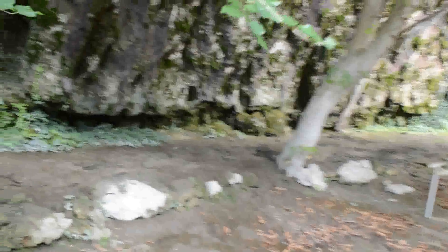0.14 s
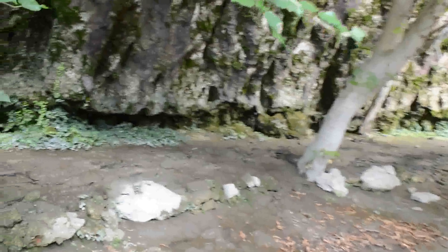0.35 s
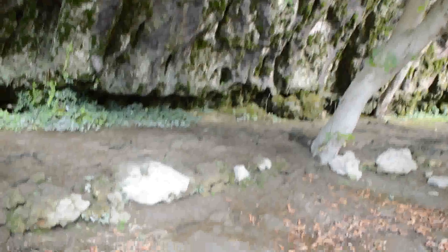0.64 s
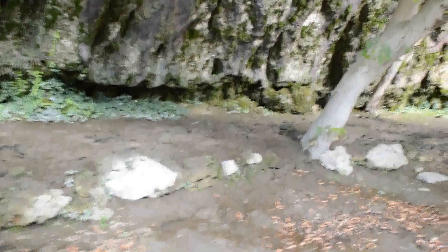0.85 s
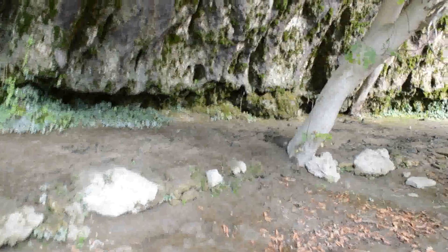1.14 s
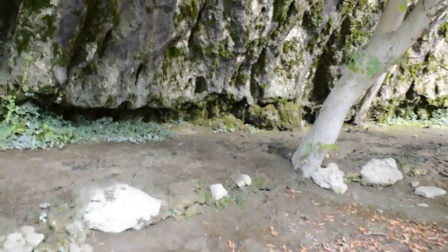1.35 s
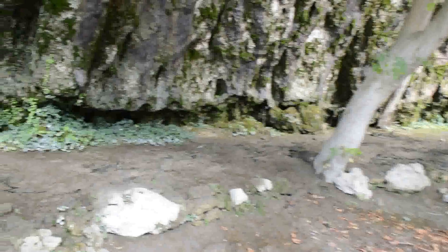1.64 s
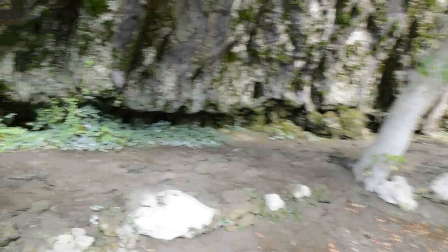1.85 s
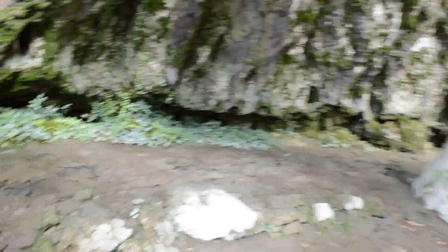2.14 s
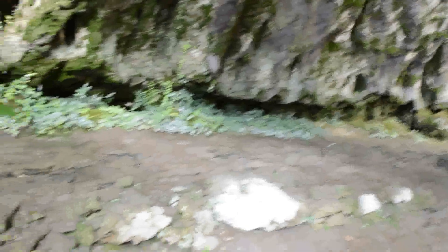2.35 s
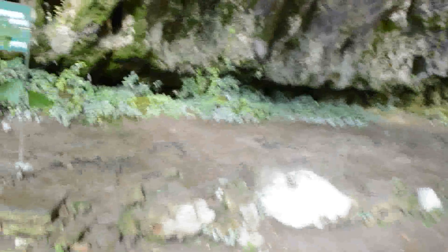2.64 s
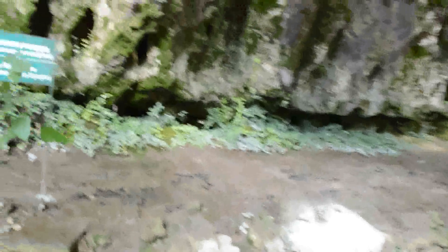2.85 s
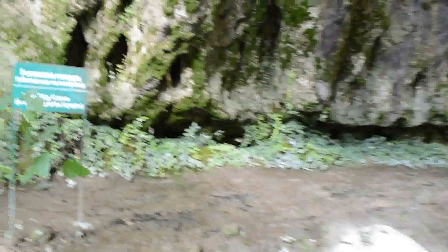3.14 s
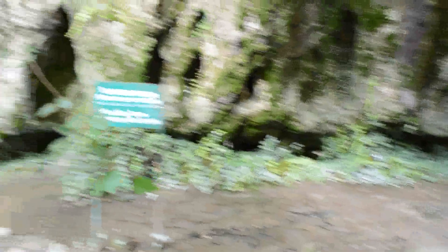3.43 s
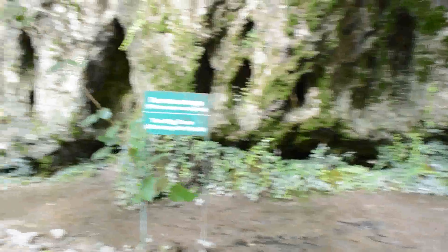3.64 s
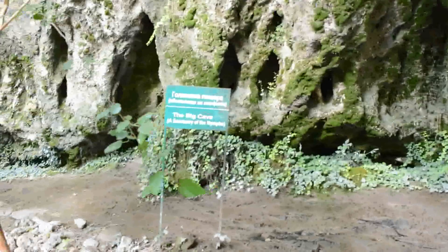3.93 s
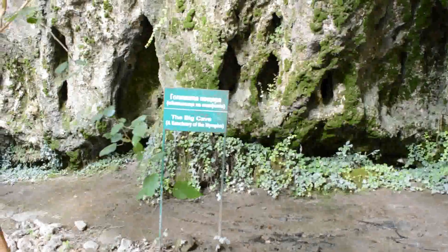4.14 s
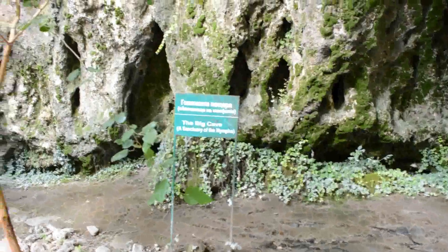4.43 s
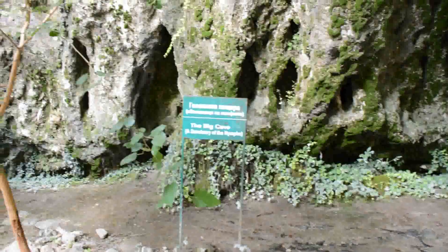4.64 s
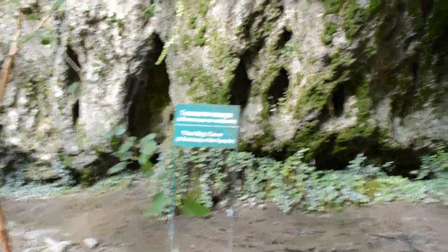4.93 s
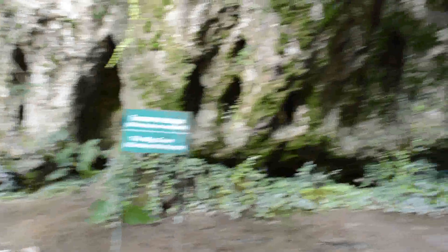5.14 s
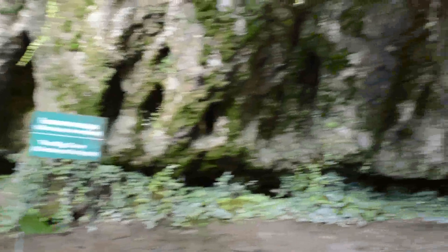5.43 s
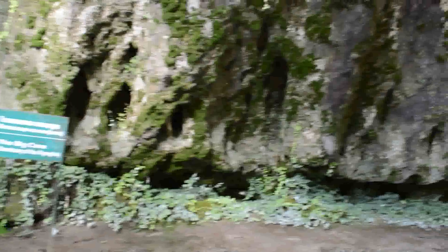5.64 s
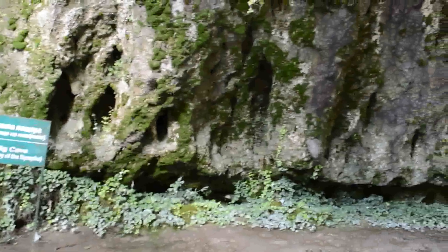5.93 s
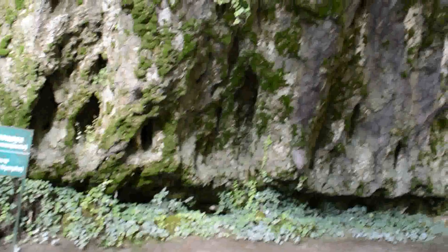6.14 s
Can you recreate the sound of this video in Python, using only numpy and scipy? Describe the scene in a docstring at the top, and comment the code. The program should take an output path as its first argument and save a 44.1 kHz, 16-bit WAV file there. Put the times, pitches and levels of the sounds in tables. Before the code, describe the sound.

Close, dry-edged dripping dominates: treble-heavy ticks of varied loudness, the strongest a lower, woody smack about one second in, others clustering before three seconds. Light patter and a faint far trickle fill the gaps; small bubbles plip in puddles. Someone moves slightly with a handheld camera, causing plastic clicks, dull thuds, faint grit scuffs and low rumble. Sheltered outdoor rock, short faint echo, centered mono sound.

```python
"""Under a mossy overhang: drops fall onto leaves and wet ground, and the rock answers with a short grainy echo.
Close by, each loud drop is a brief ring with a broad crack; drips in puddles are ringing bubbles that glide up.
Smaller drops patter around; farther off, flickering bands of noise make a trickle, narrow ones a low drone.
A walker holds a camera with one microphone: its shell clicks, steps and hands thud, soles scuff, the capsule
rumbles. The capsule favours the upper treble of the drops."""
import sys
import numpy as np
from scipy import signal
from scipy.io import wavfile

SR = 44100
rng = np.random.default_rng(int(sys.argv[2]) if len(sys.argv) > 2 else 0)


def to_wav(s):
    """Save 16-bit WAV."""
    ch = np.atleast_2d(s).T  # columns
    pcm = np.round(np.clip(ch, -1, 1) * 32767)  # PCM
    wavfile.write(sys.argv[1], SR, pcm.astype(np.int16))


N = 276948

# Distant low drone. Each row: centre in Hz, width in Hz, rms level in dB.
DRONE_TONES = [(62.9, 3, -68), (127.7, 31, -63)]
# Colour of the distant trickle. Each row: frequency in Hz, relative noise density in dB per Hz.
TRICKLE_COLOUR = [(24, -36), (40, -34), (223, 6), (483, 2.5), (533, 0.5), (619, 1.5), (923, 3),
                  (1410, -0.5), (3820, -9), (6440, -0.5), (7860, -16.5), (9590, 5), (14300, -19),
                  (15400, -7)]
TRICKLE_DB = -48.5  # rms
# Rumble of hands and wind on the capsule. Each row: time in seconds, level in dB.
RUMBLE_LEVEL = [(0.0, -82), (0.17, -51), (0.23, -67), (0.54, -60), (0.58, -85), (0.63, -67), (0.75, -50),
                (1.47, -87), (2.1, -67), (2.17, -60), (2.2, -75), (2.89, -84), (4.67, -113), (4.78, -101),
                (4.93, -86), (6.28, -76)]
# Soles scuffing grit. Each row: middle in seconds, length in seconds, level before fading in dB, centre in Hz.
SCUFFS = [(0.093, .06, -44, 1500), (0.738, .05, -45, 890), (0.877, .05, -51, 496), (1.817, .08, -47.5, 600),
          (1.919, .04, -45, 800), (2.69, .08, -46, 610), (3.39, .12, -49.5, 400), (3.553, .08, -53, 300),
          (3.877, .09, -46.5, 600), (4.571, .1, -46, 1900), (5.924, .11, -42.5, 910)]
# Dull thuds of steps and hands. Each row: start in seconds, peak before thinning in dB, pitch in Hz.
THUDS = [(0.156, -38, 345), (0.7369, -28, 450), (0.874, -39, 200), (1.7914, -22.5, 367), (1.912, -37, 256),
         (1.921, -43, 406), (2.663, -35, 550), (2.678, -31.5, 225), (3.364, -36, 380), (3.374, -32.5, 174),
         (3.855, -41, 400), (3.875, -35.5, 182), (5.884, -45, 150), (5.941, -38, 187)]
THUD_CYCLES = 0.91
THUD_TICK_DB, THUD_TICK_HZ = -6, 1500  # tick on the start of a 350 Hz thud, relative to the thud
THUD_TICK_DB_PER_OCTAVE = 9  # deep thuds are soft blows with little tick
# Clicks of the camera shell. Each row: start in seconds, peak in dB, pitch that the struck spot favours in Hz,
# how freely the grip lets it ring as a share of the free decay time.
CLICKS = [(.072, -34, 1300, 0.65), (0.0852, -31.5, 2280, 0.96), (0.4611, -20, 1510, 0.99),
          (0.5354, -18.5, 2480, 0.99), (2.1688, -27.5, 1480, 0.98)]
# Modes of the shell. Each row: pitch in Hz, relative level in dB, free decay by 60 dB in seconds.
SHELL_MODES = [(1026, 5.5, 0.034), (1190, 12, 0.011), (1880, 10.5, 0.012), (2230, 13, 0.0071),
               (2477, 11, 0.016), (3130, 2, 0.018)]
# Swell of the patter. Each row: time in seconds, relative level in dB.
PATTER_SWELL = [(0.0, -38), (0.45, -42.5), (0.66, -40), (1.21, -40.5), (1.82, -44.5), (2.17, -37),
                (2.33, -38.5), (2.62, -42.5), (2.82, -40), (3.55, -43.5), (4.39, -42), (4.55, -40),
                (4.88, -44), (5.11, -41.5), (5.27, -40), (5.61, -44.5), (5.89, -40.5), (6.28, -45)]
# Rock faces that return more sound. Each row: delay in seconds, spread in seconds, lift in dB.
ROCK_FACES = [(0.0132, 0.00077, 5.5), (0.0019, 0.02, 3)]
# Drips that trap a bubble in a puddle. Each row: start in seconds, peak at the capsule in dB, pitch in Hz.
DRIPS = [(1.4012, -45, 1800), (1.5228, -44, 1700), (1.681, -44, 1320), (1.728, -42, 1910),
         (2.776, -46, 1300), (2.7904, -38.5, 1325), (3.3894, -49, 2320), (3.4236, -43, 1590),
         (3.5423, -42, 1120), (3.7683, -38.5, 3030), (3.9382, -42.5, 1730), (3.9973, -41, 1970),
         (4.0498, -40, 1770), (4.1642, -44, 1810), (4.432, -45, 1760), (5.306, -43, 1780),
         (5.47, -43, 1770), (5.8474, -38.5, 1800)]
# Loud drops. Each row: start in seconds, peak at the capsule in dB, pitch in Hz, relative echo gain in dB.
DROPS = [(0.0161, -13, 8860, -37), (0.1937, -34.5, 4140, -23), (0.3896, -26.5, 10000, -35),
         (0.4507, -26, 10300, -39), (0.5832, -14, 8400, -20), (0.5949, -18, 5550, -40),
         (0.596, -24, 8400, -23), (0.6543, -26.5, 4400, -36), (0.9375, -28.5, 9800, -23.5),
         (1.0549, -5, 3050, -28), (1.1864, -29.5, 9200, -28), (1.2781, -20, 2740, -31.5),
         (1.2806, -19.5, 9200, -36), (1.3596, -36, 8550, -18), (1.4474, -28.5, 10500, -24),
         (1.492, -26, 2870, -33), (1.5006, -24, 6470, -34), (1.6046, -25, 8000, -27),
         (1.7124, -31, 10000, -20), (1.7932, -33.5, 6850, -21), (1.882, -24, 9600, -28),
         (1.933, -27, 9200, -33), (1.9602, -27, 3200, -33), (2.0713, -34, 7340, -33),
         (2.1504, -32.5, 6400, -19.5), (2.1886, -27, 8950, -26), (2.2028, -21.5, 6350, -40),
         (2.243, -33, 8300, -18), (2.2796, -21, 8000, -26.5), (2.3136, -18, 9700, -33),
         (2.3423, -25, 8500, -36), (2.3995, -20, 8600, -41), (2.4048, -27.5, 7240, -23.5),
         (2.4264, -29, 9000, -35), (2.5075, -22, 3270, -27), (2.637, -33, 6600, -23.5),
         (2.647, -24, 7600, -38), (2.701, -30, 9100, -29), (2.8159, -15, 6560, -34),
         (2.9085, -20, 9100, -35), (2.9429, -10, 7410, -31), (3.217, -25, 7600, -32),
         (3.3534, -27.5, 6400, -43), (3.4406, -22, 9900, -35), (3.494, -35, 9800, -19.5),
         (3.7413, -15, 7700, -32), (3.9793, -27, 8400, -26.5), (4.088, -24.5, 7600, -24),
         (4.262, -27, 8350, -36), (4.106, -34.5, 4150, -24), (4.3751, -33.5, 10000, -24.5),
         (4.5523, -24, 2550, -26.5), (4.566, -31.5, 6100, -22.5), (4.567, -32, 10500, -19.5),
         (4.616, -33, 6500, -21), (4.686, -30.5, 2480, -24.5), (4.812, -22.5, 9700, -31),
         (5.0903, -26, 7100, -31), (5.1511, -15.5, 7900, -30), (5.225, -22.5, 10500, -38),
         (5.306, -27, 6300, -35), (5.3163, -30, 10100, -23), (5.3745, -23, 7800, -27.5),
         (5.4854, -26, 10100, -36), (5.6382, -28, 6550, -24.5), (5.7537, -28, 3700, -26.5),
         (5.8018, -29, 8700, -23.5), (5.8434, -19, 9200, -35), (5.853, -34, 10500, -25),
         (5.9558, -35, 7740, -22), (6.1887, -29.5, 8100, -20)]
# How long a struck leaf rings. Each row: pitch in Hz, cycles (60 dB of decay takes three times as many).
LEAF_CYCLES = [(2500, 0.7), (3100, 1.5), (4300, 5.2), (5700, 14), (6500, 2.04), (7600, 0.73), (8400, 1.43),
               (10200, 3.6)]
CRACK_DB, CRACK_DB_PER_OCTAVE = -1, -4  # crack beside a 9 kHz ring; it stands out more beside lower rings
ECHO_WIDTH = 0.33  # width of the echo's pitch filter, as a share of the pitch
ECHO_RING_DB, ECHO_BLOW_DB = 1.5, -2.5  # added to each drop's echo gain: narrow ring, whole blow
ECHO_BLOW_T60_S = 0.19
TOP_HZ = 15450


def undb(db):
    """Turn dB into a gain."""
    return 10 ** (np.asarray(db) / 20)


def level(x, db):
    """Scale to an rms level in dB."""
    return x * undb(db) / np.sqrt(np.mean(x ** 2))


def curve(table):
    """A (seconds, value) table read at every sample."""
    return np.interp(np.arange(N) / SR, *np.transpose(table))


def band(x, hz, width_hz):
    """Two-pole band-pass, gain 1 at the centre."""
    return signal.lfilter(*signal.iirpeak(min(hz, .45 * SR), hz / width_hz, fs=SR), x)


def thin(x, hz):
    """High-pass: a small source sends out little below its own pitch."""
    return signal.lfilter(*signal.butter(2, hz, "high", fs=SR), x)


def walk(rate):
    """Random levels, this many a second, joined by slopes; spread about 1.3."""
    knots = rng.standard_normal(int(N / SR * rate) + 2)
    return 1.6 * np.interp(np.arange(N) * rate / SR, np.arange(len(knots)), knots)


def add(out, s, grain):
    """Mix a grain in at a time in seconds."""
    i = int(s * SR)
    out[i:i + len(grain)] += grain[:len(out) - i]


def ring(hz, cycles, glide=0., rise=0.44):
    """A peak-1 ring: swells over `rise` cycles, dies by 60 dB in three times `cycles` (1.5 at least)."""
    decay_cycles = 3 * max(cycles, .5)
    turns = np.arange(int(decay_cycles * SR / hz) + 8) * hz / SR
    fade = turns / decay_cycles
    swell = 1 - np.exp(-(turns / rise) ** 2)
    x = np.sin(2 * np.pi * turns * (1 + glide * fade)) * 1000. ** -fade * swell
    return x / np.abs(x).max()


def burst(t60_s):
    """A dying puff of noise."""
    t = np.arange(int(t60_s * SR) + 2) / SR
    return rng.standard_normal(len(t)) * 1000. ** (-t / t60_s)


def drone():
    """Far off: narrow bands of noise waver like low tones."""
    return sum(level(band(rng.standard_normal(N), hz, width_hz), db) for hz, width_hz, db in DRONE_TONES)


def trickle():
    """Distant trickle: third-octave noise bands flicker alone; the higher ones follow the patter a little."""
    out, swell_db = 0, curve(PATTER_SWELL)
    points_hz, points_db = np.transpose(TRICKLE_COLOUR)
    for hz in 45 * 2 ** (np.arange(26) / 3):
        colour_db = np.interp(np.log(hz), np.log(points_hz), points_db)
        flicker_db = 1.62 * walk(9)
        # no following up to 600 Hz, full share from two octaves above
        share = 0.37 * np.clip(np.log2(hz / 600) / 2, 0, 1)
        follow_db = share * (swell_db - swell_db.mean())
        noise = band(band(rng.standard_normal(N), hz, hz / 3), hz, hz / 3)
        out = out + undb(colour_db + flicker_db + follow_db) * noise
    return level(out, TRICKLE_DB)


def rumble():
    """Hands and wind on the capsule: unsteady noise narrowed around 39 Hz."""
    noise = rng.standard_normal(N)
    for _ in range(3):
        noise = band(noise, 39, 34)
    noise *= undb(2.5 * walk(10))
    return level(noise, 0) * undb(curve(RUMBLE_LEVEL))


def scuffs():
    """Soles on grit: noise with a fast random level, filtered and faded in and out."""
    out = np.zeros(N)
    for s, length_s, db, hz in SCUFFS:
        size = int(length_s * SR)
        grit = rng.standard_normal(size) * undb(2.7 * walk(304)[:size])
        add(out, s - length_s / 2, level(band(grit, hz, 1.04 * hz), db) * np.hanning(size))
    return out


def thuds():
    """Steps and hands: a heavily damped low ring with a tick on its start."""
    out = np.zeros(N)
    for s, db, hz in THUDS:
        add(out, s, undb(db) * thin(ring(hz, THUD_CYCLES, rise=0.34), 0.35 * hz))
        tick_db = db + THUD_TICK_DB + THUD_TICK_DB_PER_OCTAVE * np.log2(hz / 350)
        add(out, s, undb(tick_db) * ring(THUD_TICK_HZ, 2.6, rise=0.14))
    return out


def clicks():
    """Camera shell in the hand: modes near the struck spot's pitch are favoured, and the grip damps them."""
    out = np.zeros(N)
    t = np.arange(SR // 20) / SR
    for s, db, spot_hz, freedom in CLICKS:
        grain = np.zeros(len(t))
        for (hz, mode_db, t60_s), chance in zip(SHELL_MODES, rng.standard_normal(len(SHELL_MODES))):
            tilt_db = -4.5 * np.log2(hz / spot_hz) ** 2 + 0.39 * chance
            decay = 1000. ** (-t / (freedom * t60_s))
            grain += undb(mode_db + tilt_db) * np.sin(2 * np.pi * hz * t) * decay
        grain *= 1 - np.exp(-t / 0.00034)
        add(out, s, undb(db) * grain / np.abs(grain).max())
        # a thin tick as the parts slip, just before the shell rings
        add(out, s - .0008, undb(db - 3.0) * band(burst(0.0072), 6800, 7100))
    return out


def rock(x, t60_low_s=0.5, t60_high_s=0.2, split_hz=4500):
    """Echo of the craggy face: decaying noise, drawn afresh each time, with a decay time each side of the split."""
    t = np.arange(SR * 2 // 5) / SR
    noise = rng.standard_normal(len(t))
    low = signal.lfilter(*signal.butter(1, split_hz, fs=SR), noise)
    tail = low * 1000. ** (-t / t60_low_s) + (noise - low) * 1000. ** (-t / t60_high_s)
    lift_db = sum(db * np.exp(-((t - delay_s) / spread_s) ** 2) for delay_s, spread_s, db in ROCK_FACES)
    # single crags stand out as lumps about 3 milliseconds long
    lift_db = lift_db + 2 * np.repeat(rng.standard_normal(len(t) // 128 + 1), 128)[:len(t)]
    build_up = np.clip(t / .003, 0, 1)
    return signal.fftconvolve(x, undb(lift_db) * build_up * tail)


def patter(count=1500, spots=5, low_hz=1500, octaves=2.97, tilt_db=5.0, db=-6.0):
    """Small drops at random on several spots: short rings, most faint, a few louder, each spot with its echo."""
    out = np.zeros(N)
    for drops_here in rng.random((spots, count // spots, 4)):
        near = np.zeros(N)
        for when, size, pitch, length in drops_here:
            grain = ring(low_hz * 2 ** (octaves * pitch ** .5), 1.6 + 3 * length)
            size_db = -3 * np.log(1 - .96 * size)
            pitch_db = tilt_db * octaves * pitch  # higher drops are louder
            add(near, when * N / SR, undb(pitch_db + size_db) * grain)
        out += near + undb(-25) * rock(near)[:N]
    return level(out, db) * undb(curve(PATTER_SWELL))


def drips():
    """A bubble trapped in a puddle rings for many cycles, gliding up, with a faint echo."""
    out = np.zeros(N)
    for s, db, hz in DRIPS:
        grain = undb(db) * ring(hz, 25.0, glide=.14, rise=0.79)
        add(out, s, grain)
        add(out, s, undb(-40) * rock(grain))
    return out


def drops():
    """Close by: a blow makes a leaf ring under a broad crack; the rock returns the ring and the whole blow."""
    out = np.zeros(N)
    for s, db, hz, echo_db in DROPS:
        grain = ring(hz, np.interp(hz, *np.transpose(LEAF_CYCLES)))
        crack_db = CRACK_DB + CRACK_DB_PER_OCTAVE * np.log2(hz / 9000)
        crack = ring(12650, 1.0, rise=0.094)[:len(grain)]
        add(grain, 0, undb(crack_db) * crack)
        grain = thin(grain, 0.5 * hz)
        grain *= undb(db) / np.abs(grain).max()
        add(out, s, grain)
        grain = np.append(grain, np.zeros(256))  # room for the filters to ring out
        pitch = band(band(grain, hz, ECHO_WIDTH * hz), hz, ECHO_WIDTH * hz)
        add(out, s, undb(echo_db + ECHO_RING_DB) * rock(pitch))
        add(out, s, undb(echo_db + ECHO_BLOW_DB) * rock(grain, ECHO_BLOW_T60_S, ECHO_BLOW_T60_S))
    return out


def capsule(x, hz=9500, width_hz=2500, lift_db=-4, fall_hz=12500):
    """The microphone port resonates, adding a band at this gain, and loses the treble above."""
    x = x + undb(lift_db) * band(x, hz, width_hz)
    return signal.lfilter(*signal.butter(2, min(fall_hz, .45 * SR), fs=SR), x)


def scene():
    """One microphone feeds both channels; the capsule colours only the drops, drips and patter."""
    water = capsule(patter() + drips() + drops())
    handling = rumble() + scuffs() + thuds() + clicks()
    mono = drone() + trickle() + handling + water
    return np.array([mono, mono])


def record(dry):
    """Steep low-pass: almost nothing is heard above 15.45 kHz."""
    return signal.sosfilt(signal.ellip(10, .2, 60, TOP_HZ, fs=SR, output="sos"), dry)


dry = scene()
out = record(dry)
to_wav(out)
```